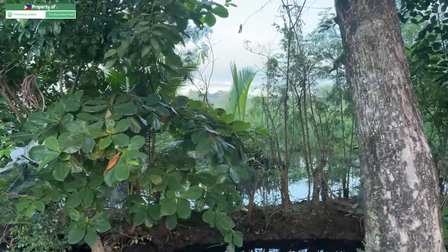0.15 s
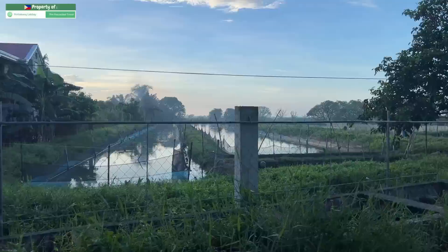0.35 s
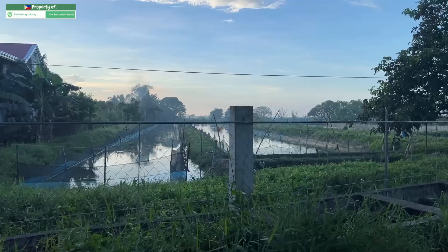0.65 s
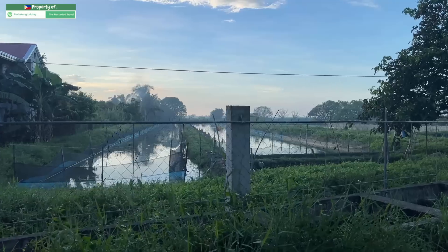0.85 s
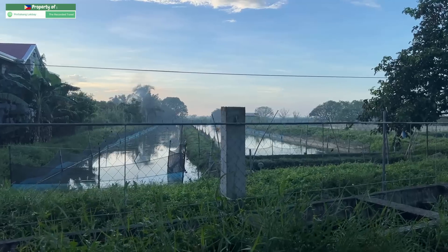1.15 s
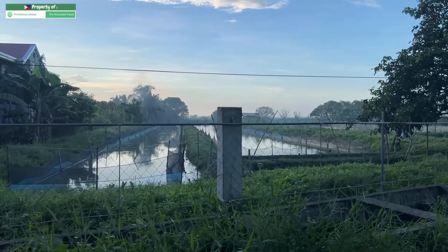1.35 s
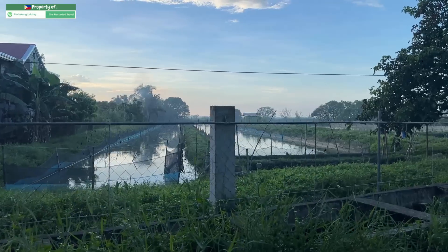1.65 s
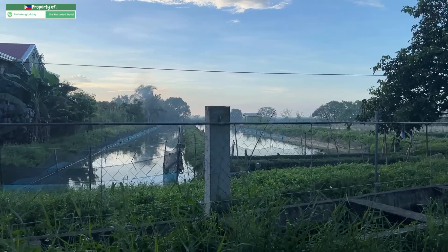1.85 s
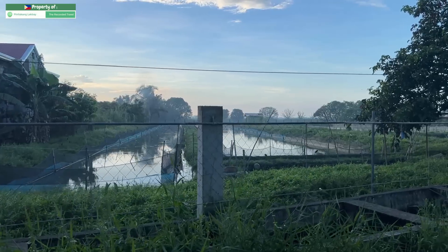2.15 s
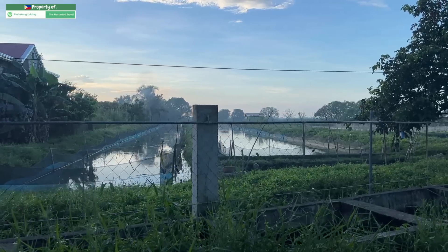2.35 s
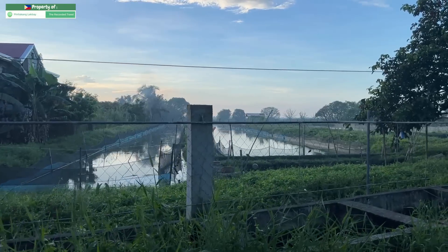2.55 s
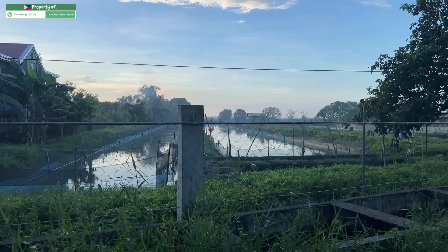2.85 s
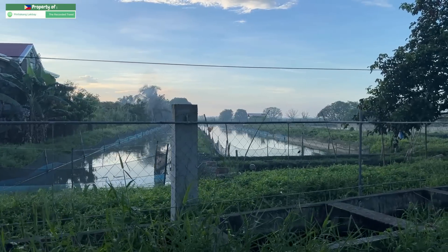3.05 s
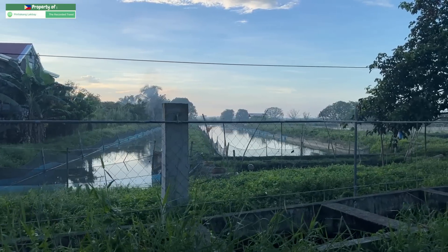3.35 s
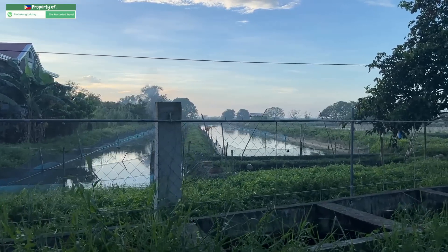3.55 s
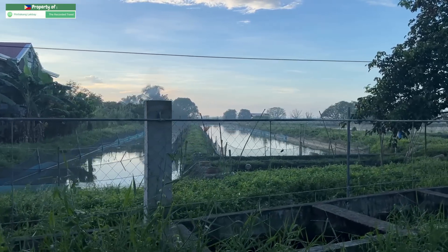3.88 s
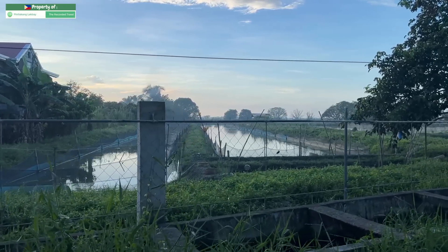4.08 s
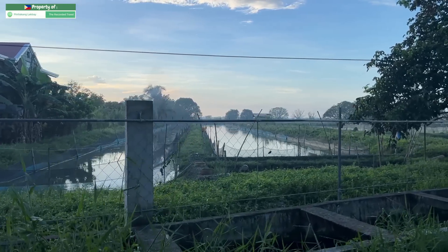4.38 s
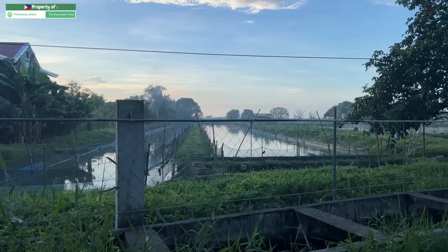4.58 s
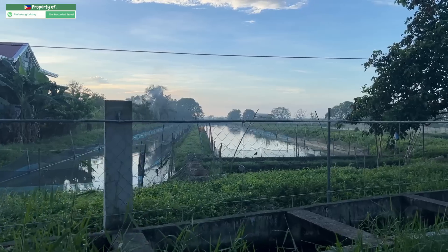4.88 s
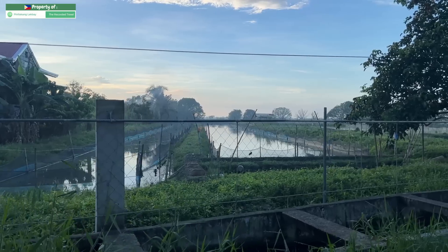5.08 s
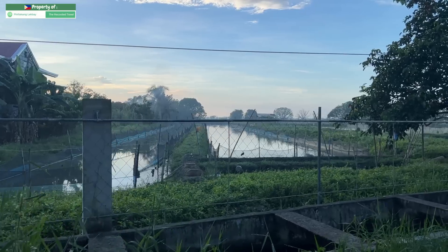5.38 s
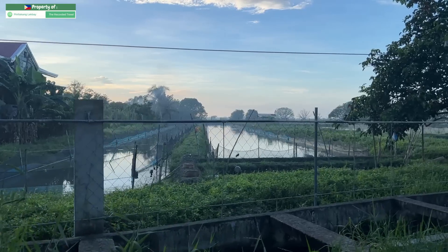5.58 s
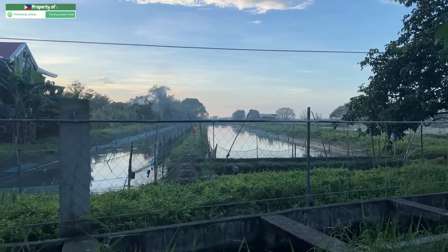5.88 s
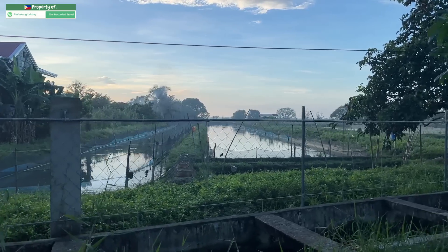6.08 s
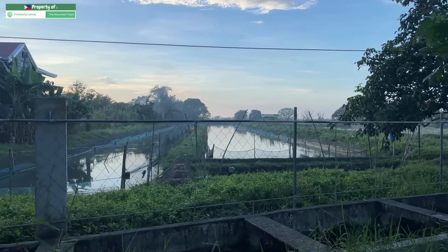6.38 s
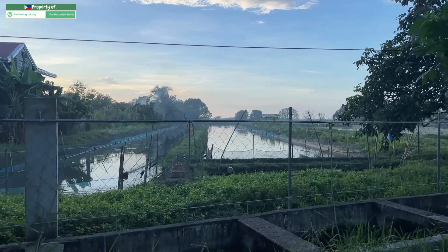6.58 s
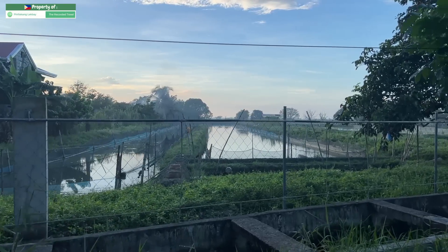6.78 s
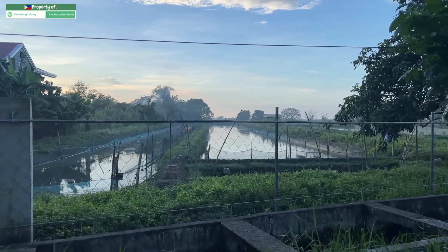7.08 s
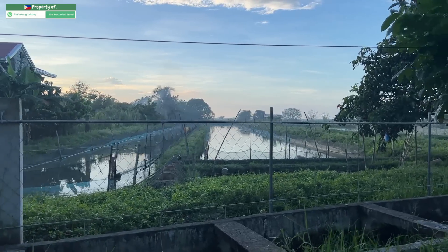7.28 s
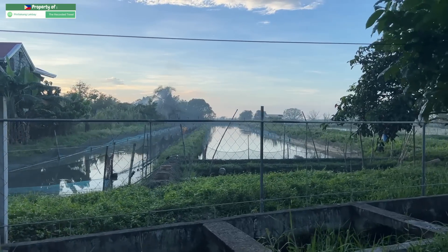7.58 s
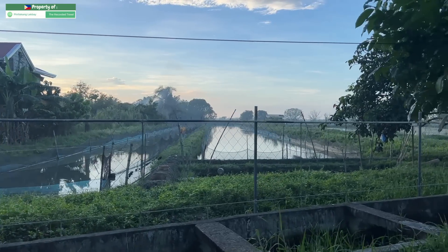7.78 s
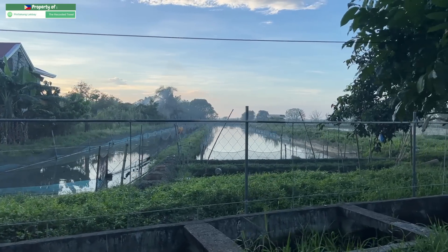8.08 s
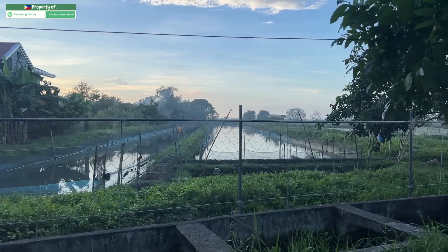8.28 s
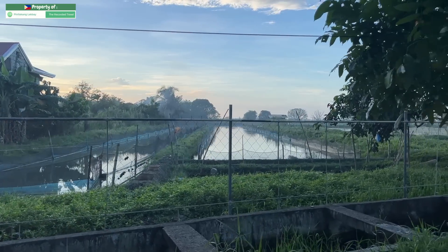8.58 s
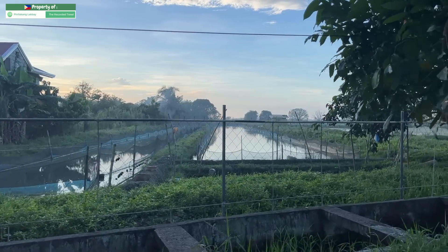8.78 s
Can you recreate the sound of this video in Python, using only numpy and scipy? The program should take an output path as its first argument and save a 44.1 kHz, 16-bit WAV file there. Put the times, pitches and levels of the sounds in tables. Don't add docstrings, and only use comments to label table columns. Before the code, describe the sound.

The sound opens on the tail of a hen's cluck, close and loud, with a soft rising cluck at 0.2 s. At about 0.35 s the background switches abruptly: the high, thin insect buzz becomes clearly stronger over a steady distant low rumble and airy hush. The near hen clucks at 0.37, 0.6 and 0.9 s, then again around 2.0, 2.3, 2.65 and 3.3 s, each a quick swoop that breaks upward and falls, raspy, slightly overloaded, with short yard echoes. Faint far cackles appear near 1.8, 3.6 and 6.7 s. Small birds whistle thinly, mostly from 2.2 to 5.3 s. A second hen on the left gives isolated two-part clucks at 4.6 and 5.8 s, then a group at 7.9, 8.2 and 8.6 s, the last ones softer and ragged. Dry twig ticks and light leaf rustles dot the whole, which ends on insects and rumble.

```python
import sys
import numpy as np
from scipy import signal
from scipy.fft import rfft, irfft, next_fast_len
from scipy.io import wavfile

SR = 44100
rng = np.random.default_rng(int(sys.argv[2]) if len(sys.argv) > 2 else 0)


def wav_record(signal):
    frames = np.transpose(np.atleast_2d(signal))
    bounded = np.clip(frames, -1, 1)
    quanta = np.round(bounded * 32767).astype(np.int16)
    wavfile.write(sys.argv[1], SR, quanta)


def nominal_scale(level):
    x = np.asarray(level, float) / 20
    return 10 ** x


N = 393809
TIME = np.arange(N) / SR
SIZE = next_fast_len(N + SR)
FREQ = np.maximum(np.arange(SIZE // 2 + 1) * SR / SIZE, 1)

# (frequency [Hz], density [dB per Hz])
RUMBLE = [(12, -73), (20, -66.5), (39, -9), (71, -1), (125, -5), (151, -9), (251, -16), (323, -22),
          (375, -20), (552, -28), (700, -54), (910, -68), (1540, -120)]
HUSH = [(180, -52), (300, -3), (350, -19.5), (477, -13), (601, -1), (739, -4.5), (1390, -9.5),
        (3040, -14.5), (5360, -14), (6500, -9), (8450, -51), (14300, -120)]
# (time [s], level [dB])
BUSTLE = [(0, -45.5), (.33, -49), (.36, -47.5), (1.79, -53), (2.2, -50), (7.66, -55), (8.12, -50.5),
          (8.93, -53)]
RUMBLE_DB, RUMBLE_FOLLOWS = -32.5, 0.46
# (centre [Hz], width [Hz], level [dB], throb rate [1/s])
INSECTS = [(6640, 110, -15.5, 95), (7266, 665, -7, 59), (8510, 1150, -15, 120), (10146, 1050, -20.5, 42),
           (14270, 820, -34, 42)]
SCENE_CHANGE_S = .347
INSECTS_BEFORE_DB, INSECTS_AFTER_DB, INSECTS_RISE_DB_PER_S = -48, -37, 0.21

# (frequency [Hz], likeness [0-1], left lead [rad], left-right [dB])
PORTS_AIR = [(60, .98, 0, -.7), (170, .9, .1, -1), (350, .4, .3, 0), (900, .5, 2.5, 0), (2200, .3, .9, 1),
             (4500, .4, .5, 5), (6000, .4, .2, 7), (7200, .65, -.4, 2), (8400, .87, -1.4, 2),
             (9300, .94, -2.5, 0), (9950, .995, -3.14, 0), (10700, .94, -3.95, 0), (14400, .75, -6.5, 0)]
PORTS_AHEAD = [(143.6, 0.68, 0.27, -1.5), (520, 0.28, 1.45, -1), (1030, 0.56, 1.33, 2),
               (1536, 0.52, 1.33, -3.5), (3000, 0.19, 2.2, 6.5), (8580, 0.18, 9.9, 11.5)]
PORTS_LEFT = [(150, 0.21, 0.16, -5), (520, 1, 1.94, 1.5), (1110, 0.16, 2.25, 0), (1670, 0.22, 4.08, 3),
              (3000, 0.3, 4.87, 6), (8060, 0.38, 11.6, 20)]
# (frequency [Hz], T60 [s])
YARD_DECAY = [(300, 0.9), (600, 0.63), (1000, 0.52), (1700, 0.52), (3000, 0.55), (7000, 0.34)]
# (delay [s], level [dB])
WALLS_AHEAD = [(.019, -20), (.035, -21), (.071, -20)]
WALLS_LEFT = [(.019, -16.5), (.035, -15), (.071, -16)]
FAR_WALL_AHEAD, FAR_WALL_LEFT = (0.11, -20), (0.15, -21.5)
FAR_WALL_CUT_HZ = 750
WET_AHEAD_DB, WET_LEFT_DB = -16, -12

# (start [s], peak [dB], centre [Hz],
# length [s])
RUSTLES = [(8.51, -41, 5500, .14), (8.17, -47, 4150, 0.13), (3.33, -42, 5700, 0.09),
           (.99, -31.5, 230, 0.133), (1.185, -34, 320, .045), (7.98, -26.5, 360, 0.0587),
           (5.81, -17, 400, 0.035), (2.996, -39, 2330, 0.08), (3.965, -47, 1490, 0.2),
           (5.44, -43, 5500, 0.13), (5.91, -46.5, 3300, 0.1), (6.36, -50, 4700, 0.09),
           (6.711, -52.5, 3800, 0.19), (.08, -43, 4050, .13), (.095, -43, 3450, .09), (.12, -46, 3050, .07),
           (0, -47, 3200, .055), (3.36, -45, 4400, .08), (5.555, -47, 2400, .06), (5.36, -50, 2500, .06),
           (4.66, -31, 330, .05), (7.8, -48, 4000, .05)]
# (start [s], peak [dB], pitch [Hz], left-right [dB])
TICKS = [(0.348, -18, 900, 1), (0.3634, -20, 800, 1), (.632, -20, 900, 0), (0.898, -25, 980, -4),
         (2.039, -25, 900, 0), (2.33, -22, 900, -1.5), (0.172, -25.5, 1500, 4.5), (2.0714, -27, 2700, 3),
         (2.0999, -29, 2580, 7.5), (2.1648, -25.5, 2690, 6.5), (2.235, -31, 3480, 15),
         (2.2606, -27.5, 2500, 8), (2.7205, -23.5, 2800, 14), (5.779, -29, 2900, 12),
         (5.812, -27.5, 2700, -6), (6.447, -38, 5700, 15), (7.3067, -35, 5240, 9), (1.511, -30, 1130, 1),
         (1.6492, -25.5, 1110, -2.5), (1.729, -29, 1410, 2.5), (1.845, -28, 1170, 13),
         (1.88, -30, 1090, 15), (2.4881, -11.5, 1020, 5.5), (2.4885, -18.5, 1960, 7),
         (2.528, -24.5, 1670, 7.5), (3.0085, -20.5, 1700, 2), (3.055, -18.5, 1120, -1),
         (3.164, -20.5, 1420, -3), (3.236, -22, 1310, 18), (3.709, -26, 1000, 18), (3.9578, -22, 1020, 4),
         (3.9844, -25.5, 5096, 19), (4.164, -28, 1390, 4), (4.435, -14.5, 4410, 10), (4.458, -27, 3350, 8),
         (5.2009, -23, 2410, 7), (5.4687, -29.5, 2120, 6), (5.5336, -33, 1840, -2),
         (6.0422, -38, 2440, 1.5), (6.2415, -29, 1360, 9), (6.9101, -28, 2107, 6), (7.042, -33, 1174, 12),
         (7.4655, -39, 4870, -22), (7.5191, -25.5, 3180, 13), (7.6574, -32.5, 2290, 8),
         (7.794, -32, 934, 14)]
TICK_T60_S = .008

# (start [s], length [s], pitch [Hz], level [dB])
CACKLES = [(1.775, 0.063, 999, -40.5), (1.825, 0.13, 1172, -38.5), (1.94, 0.043, 1040, -34),
           (3.49, 0.089, 1157, -39.5), (3.58, 0.043, 1135, -40.5), (3.63, 0.041, 1088, -39.5),
           (3.7, 0.045, 989, -40.5), (3.805, 0.147, 1065, -43), (4.03, 0.074, 670, -57),
           (6.64, 0.036, 1028, -54.5), (6.68, 0.195, 1222, -57.5), (6.89, 0.068, 1140, -59.5),
           (6.99, 0.142, 1188, -55)]
# (share of length, share of pitch, level [dB])
CACKLE = [(0, .82, 4), (0.221, 0.97, -1), (.8, 0.94, 5), (0.999, .84, -17.5)]
# (start [s], length [s], first pitch [Hz], last pitch [Hz], level [dB])
CHIRP = [
    (.068, 0.039, 4750, 4020, -44),
]
WHISTLES = [(2.25, .14, 5440, 5970, -46.5), (2.38, 0.25, 5870, 5087, -43.5),
            (3.69, 0.21, 5190, 4990, -43.5), (3.87, 0.32, 4970, 4996, -43.5),
            (2.88, 0.23, 3775, 3530, -48.5), (3.08, 0.1, 3680, 3900, -44), (3.18, 0.097, 3824, 3820, -48),
            (3.37, 0.089, 3800, 3800, -48), (3.49, 0.085, 3786, 3796, -42.5), (4.27, 0.4, 3585, 3516, -51),
            (4.66, 0.11, 3410, 3590, -48), (4.91, 0.23, 3090, 3120, -47.5), (5.15, 0.11, 3000, 2824, -48.5),
            (5.28, 0.071, 3110, 3410, -44.5), (7.14, 0.13, 2550, 2434, -53.5),
            (7.15, 0.098, 2300, 2220, -54), (1.07, 0.07, 4800, 3920, -48),
            (1.125, 0.051, 3580, 5350, -44.5), (6.8, 0.043, 4870, 5200, -50),
            (7.33, 0.056, 4460, 4300, -53)]
WHISTLE_FADE_DB = -2.5

# (centre [Hz], width [Hz], lift [dB])
THROAT = [(867, 98, 3), (1669, 47, 4.5)]
# (frequency [Hz], level [dB])
UPPER_AHEAD = [(1200, -22), (1600, -24.5), (1820, -13.5), (2050, -38.5), (2500, -37), (3000, -40.5),
               (3600, -51), (4300, -43.5)]
UPPER_LEFT = [(1200, -5), (1800, -13.5), (2150, -20.5), (2400, -33.5), (2750, -47), (3150, -23),
              (3600, -57)]
UPPER_FAR = [(1500, -40), (2200, -36), (3300, -42)]
BRIGHTER, FULL_VOICE_DB = .4, -9
# (centre [Hz], width [Hz], level [dB])
HISS_AHEAD = [(672, 320, -27), (1845, 220, -32.5), (2994, 300, -38.5), (4100, 500, -39), (6160, 900, -39)]
HISS_LEFT = [(800, 590, -31.5), (1930, 440, -29.5), (3025, 200, -39.5), (4190, 250, -42.5),
             (4800, 230, -41.5), (5840, 300, -40), (6340, 370, -35.5)]
RASP_DB = -21

# (share of length, share of pitch, 1st, 2nd, 3rd partial [dB])
SWOOP_AHEAD = [(0, .62, -22, -19, -23), (0.35, .8, -34, -10.5, -13), (0.649, .93, -15.5, 0, -42),
               (0.901, 0.98, -27.5, 1, -27), (1, 0.93, -24, 8, -28)]
SWOOP_LEFT = [(0, .56, -31.5, -30, -28), (0.402, .83, -12, -24, 4.5), (0.648, .94, -5, 1, -11.5),
              (0.998, 0.96, -3, -9.5, -11)]
SWOOP_LONG = [(0, .62, -20, -28, -15), (.3, .8, -27.5, -17.5, -11.5), (.6, .93, -15, -5.5, -16),
              (.9, .99, -17.5, 4, -34), (1, 0.94, -24.5, 0.5, -33)]
DROP = [(0, .92, -7.5, 4.5, -24), (.22, 1, -0.5, -14, -4.5), (.42, 0.99, -7, -6, 0),
        (.63, 0.97, -10.5, -4.5, -13), (0.732, .84, -8.5, 1.5, -23), (1.001, 0.25, -25, -20, -24)]
HOLD = [(0, 0.96, -6, 4, 9.5), (.25, 1, 1, 0.5, -5), (.6, 0.95, 2, -38, 3), (1, 0.9, -25, -28, -33)]
STEADY = [(0, .93, -3, -1, -32.5), (.3, 0.96, -4.5, -5.5, -6.5), (0.549, 1, 0.5, -6, -0.5),
          (.8, 0.98, -0.5, -2.5, -9.5), (1, 0.83, -6, -14.5, -29.5)]
STEADY_FIRM = [(0, .92, -20, 4, -9.5), (.3, 0.98, -2.5, -4.5, -6.5), (.55, 0.99, 0, 1, -2),
               (.85, .99, -2, -8.5, -8), (1, 0.99, -3, -13.5, -14)]
FALL = [(0, 1, -21, -10.5, -18.5), (.3, .9, -23, -2.5, -22.5), (.65, .76, -27, -7.5, -21),
        (1, 0.51, -28.5, -15.5, -22)]
ARCH = [(0, .93, -5.5, -12.5, -18), (.14, 0.97, -2.5, -10, -5.5), (.35, 1, -2.5, -11, -1.5),
        (.52, 0.97, -1, -4.5, -5.5), (.7, .91, -7.5, -2, -21), (.8, .83, -17, -15.5, -30),
        (.93, 0.706, -15, -1, -33), (1, .68, -28, -14.5, -34.5)]
ARCH_LATE = [(0, .88, -5, -6, -19), (.25, .98, -7.5, -2, -14), (.45, 1, -1.5, -3, -1),
             (.68, 0.96, -0.5, -6.5, -7.5), (.82, .88, -7, -8, -26), (.93, 0.72, -13, 0, -28),
             (1, .7, -23.5, -9.5, -27)]
ARCH_SOFT = [(0, .55, -15, -13, -29.5), (.2, .72, -12, -5.5, -28), (.38, .88, -3.5, -4, -27),
             (.5, 0.98, -2, -12, -27), (.75, 0.96, 4.5, -21, -25), (1, 1, -7.5, -23.5, -28)]
BURST = [(0, 1, -16.5, 0, -14.5), (1, .93, -15, -1.7, -17.5)]
DROP_S, SWOOP_LEFT_S, HOLD_S, STEADY_S = .11, .08, .085, .075

# (end [s], pitch [Hz], 1st, 2nd, 3rd partial [dB])
SWOOPS_LEFT = [(4.598, 582, -11, -10.5, -19), (5.772, 563, -10, -10.5, -15),
               (7.928, 566.1, -9.5, -10, -14.5), (8.212, 497, -16, -20, -28), (8.578, 507, -17, -16, -20)]
HOLDS_LEFT = [(4.675, 609, -9, -17.5, -24), (5.86, 599, -8.5, -20, -27.5), (8.01, 611.4, -9, -24.5, -26)]
DROPS_LEFT = [(8.315, 536, -19.5, -29.5, -22), (8.665, 515, -21.5, -21.5, -25)]
# (end [s], pitch [Hz], 1st, 2nd, 3rd partial [dB])
STEADIES_AHEAD = [
    (.066, 520, -15.5, -37.5, -37),
    (.965, 507.7, -22, -35, -28.5),
    (2.095, 574.4, -14, -15.5, -25),
    (3.41, 564, -17.5, -33.5, -29),
]
STEADIES_FIRM = [(2.4, 561.3, -10.5, -19.5, -21.5), (2.724, 565, -10.5, -20.5, -24)]
# (start [s], length [s], pitch [Hz], level [dB])
SWOOPS_AHEAD = [(.585, 0.039, 440.6, -10.5), (.845, 0.044, 466.3, -11), (1.982, .037, 487.4, -10)]
SWOOPS_LONG = [(2.27, 0.05, 502, -7.5), (2.602, .057, 517.6, -6), (3.265, 0.044, 495.4, -10.5)]
FALLS_AHEAD = [(.066, 0.054, 465, -27), (.942, 0.058, 507, -11.5), (2.09, .04, 502, -10.5),
               (2.394, .038, 468, -10.5), (2.703, 0.041, 560, -10)]
ARCHES = [
    (.366, .088, 553.7, -12),
]
ARCHES_LATE = [
    (.632, .104, 520, -17.5),
]
ARCHES_SOFT = [
    (.205, .13, 501, -23.5),
]
BURSTS = [(.347, 0.0084, 476, -16), (.36, 0.0096, 401, -14.5), (.894, .01, 490, -14),
          (2.019, 0.013, 450, -12.5), (2.036, .009, 443, -13.5), (2.119, 0.0097, 401, -19)]
# (start [s], length [s], level [dB])
RATTLES = [(0.343, 0.026, -20), (.452, 0.021, -26), (0.622, 0.038, -22.5), (.735, 0.027, -27.5),
           (.89, 0.029, -25.5), (2.007, 0.14, -25.5), (2.32, 0.057, -36.5), (3.309, 0.092, -22)]
RATTLES_LEFT = [
    (8.0, 0.03, -31),
    (8.265, .06, -31.5),
    (8.61, .05, -29.5),
]
SLAPS_PER_S, SLAP_HZ, SLAP_WIDTH_HZ = 410, 677, 217
SLAP_HIGH_HZ, SLAP_HIGH_WIDTH_HZ, SLAP_HIGH_DB = 1723, 210, -11.5
# (time [s], half length [s], depth [dB])
CATCHES_AHEAD = [(2.017, 0.0013, -7), (2.033, 0.0065, -20), (.89, 0.003, -14), (0.85, .005, -5)]
CATCHES_LEFT = [(5.766, 0.0076, -7.5), (5.797, 0.0078, -14), (5.827, 0.0062, -19.5), (7.927, 0.0061, -0.5),
                (7.976, 0.0082, -10.5)]


def at_hz(points):
    hz, *columns = np.transpose(points)
    return [np.interp(np.log(FREQ), np.log(hz), column) for column in columns]


def rms_one(x):
    return x / np.sqrt(np.mean(x ** 2) + 1e-20)


def drift(rate_hz):
    r = np.exp(-2 * np.pi * rate_hz / SR)
    slow = signal.lfilter([1], [1, -2 * r, r * r], rng.standard_normal(N + SR))
    return rms_one(slow[SR:])


def band_sos(order, low_hz, high_hz):
    return signal.butter(order, [low_hz, high_hz], "band", fs=SR, output="sos")


def resonance(x, hz, width_hz):
    r = np.exp(-np.pi * width_hz / SR)
    numerator = [(1 - r * r) / 2, 0, (r * r - 1) / 2]
    denominator = [1, -2 * r * np.cos(2 * np.pi * hz / SR), r * r]
    return signal.lfilter(numerator, denominator, x + 1e-18)


def ports(x, table, other=0):
    alike, lead_rad, pan_db = at_hz(table)
    alike = np.clip(alike, 0, 1)
    mid = rfft(x, SIZE) * np.sqrt((1 + alike) / 2)
    side = rfft(other + 0 * x, SIZE) * np.sqrt((1 - alike) / 2)
    tilt = nominal_scale(pan_db / 2) * np.exp(.5j * lead_rad)
    return irfft(np.array([(mid + side) * tilt, (mid - side) / tilt]), SIZE)[:, :N]


def yard(x):
    t, tail = np.arange(SR) / SR, 0
    hz, t60_s = np.transpose(YARD_DECAY)
    edges = np.sqrt(hz[1:] * hz[:-1])
    for low, high, decay_s in zip([100, *edges], [*edges, 12000], t60_s):
        band = signal.sosfilt(band_sos(2, low, high), rng.standard_normal((2, SR)))
        tail = tail + band * nominal_scale(-60 * t / decay_s) * np.clip(t / 0.0031, 0, 1)
    return irfft(rfft(x, SIZE) * rfft(tail / np.sqrt(SR / 20), SIZE), SIZE)[:, :N]


def walls(x, near, far_wall):
    dull = signal.sosfilt(signal.butter(2, FAR_WALL_CUT_HZ, fs=SR, output="sos"), x)
    paths = [(x, *wall) for wall in near] + [(dull, *far_wall)]
    out = x
    for sound, delay_s, level_db in paths:
        out = out + nominal_scale(level_db) * np.interp(TIME - delay_s, TIME, sound, left=0)
    return out


def coloured(spectrum, patchy_db, rate_hz):
    whole = rfft(rng.standard_normal((2, N)), SIZE) * nominal_scale(at_hz(spectrum)[0])
    hz = np.transpose(spectrum)[0]
    steps = 2 * np.log2(np.clip(FREQ, hz[1], hz[-2]) / hz[1])
    out = 0
    for k in range(int(steps.max()) + 2):
        band = irfft(whole * np.clip(1 - abs(steps - k), 0, 1), SIZE)[:, :N]
        out = out + band * nominal_scale(patchy_db * drift(rate_hz))
    return rms_one(out)


def insects():
    out = 0
    for hz, width_hz, level_db, throb_hz in INSECTS:
        phase = 2 * np.pi * np.cumsum(throb_hz * (1 + 0.039 * drift(2.15))) / SR
        beat = 1 + 0.19 * np.sin(phase)
        struck = rng.random((2, N)) < 9000 / SR
        clicks = rng.standard_normal((2, N)) * struck * beat * nominal_scale(1.3 * drift(4))
        body = band_sos(3, max(hz - width_hz / 2, 20), hz + width_hz / 2)
        out = out + nominal_scale(level_db) * np.sqrt(width_hz) * rms_one(signal.sosfilt(body, clicks))
    return rms_one(out)


def background():
    hush_db = np.interp(TIME, *np.transpose(BUSTLE))
    rumble_db = RUMBLE_DB + RUMBLE_FOLLOWS * (hush_db - hush_db.mean())
    later_db = INSECTS_AFTER_DB + INSECTS_RISE_DB_PER_S * TIME
    insect_db = np.where(TIME < SCENE_CHANGE_S, INSECTS_BEFORE_DB, later_db)
    air = nominal_scale(rumble_db) * coloured(RUMBLE, patchy_db=1.5, rate_hz=14.0)
    air = air + nominal_scale(hush_db + 5.0) * coloured(HUSH, patchy_db=2, rate_hz=8)
    air = air + nominal_scale(insect_db) * insects()
    return ports(air[0], PORTS_AIR, air[1])


def rustles():
    out, rough = np.zeros((2, N)), nominal_scale(3.5 * drift(180))
    for start_s, peak_db, hz, length_s in RUSTLES:
        t = np.arange(round(length_s * SR))
        at = round(start_s * SR) + t
        grain = rng.standard_normal((2, SR))[:, :len(t)] * rough[at]
        swell = nominal_scale(peak_db) * np.sin(np.pi * t / len(t))
        out[:, at] += swell * rms_one(resonance(grain, hz, 0.15 * hz))
    return out * nominal_scale(np.array([[2.5], [-2.5]]))


def ticks():
    out, t = np.zeros((2, N)), np.arange(900) / SR
    snaps = signal.sosfilt(band_sos(2, 700, 5000), rng.standard_normal((len(TICKS), len(t))))
    for (start_s, peak_db, hz, pan_db), snap in zip(TICKS, snaps):
        ring = np.sin(2 * np.pi * hz * t) * nominal_scale(-60 * t / TICK_T60_S) * (1 - np.exp(-t / 0.00015))
        tick = ring + 0.26 * snap * nominal_scale(-60 * t / 0.041)
        i = round(start_s * SR)
        pan = np.array([[pan_db], [-pan_db]]) / 2
        out[:, i:i + len(t)] += nominal_scale(peak_db + 3.0 + pan) * tick
    return out + nominal_scale(-4.0) * yard(out.mean(axis=0))


def shaped(rows, shape):
    share, pitch, *levels = np.transpose(shape)
    out = []
    for start_s, length_s, hz, *level_db in rows:
        times_s = np.maximum(start_s + length_s * share, 0)
        out.append(np.c_[times_s, hz * pitch, np.transpose(levels) + level_db])
    return out


def ending(rows, shape, length_s):
    return shaped([(end_s - length_s, length_s, *rest) for end_s, *rest in rows], shape)


def glides(rows):
    out = []
    for start_s, length_s, first_hz, last_hz, level_db in rows:
        end = (start_s + length_s, last_hz, level_db + WHISTLE_FADE_DB)
        out.append([(start_s, first_hz, level_db), end])
    return out


def sing(tables, upper, wobble, flutter_db, edge_s, count, brighter=0):
    out = np.zeros(N)
    shake, flutter = 1 + wobble * drift(39.6), nominal_scale(flutter_db * drift(32))
    upper_hz, upper_db = np.transpose(upper)
    for rows in tables:
        s, hz, *levels = np.transpose(rows)
        span = slice(round(s[0] * SR), round(s[-1] * SR))
        t = TIME[span]
        pitch = np.interp(t, s, hz)
        phase = 2 * np.pi * np.cumsum(pitch * shake[span]) / SR
        since_start = t - s[0] + (s[0] == 0)
        edge = np.clip(np.minimum(since_start, s[-1] - t) / edge_s, 0, 1)
        gains = [nominal_scale(np.interp(t, s, level_db)) for level_db in levels]
        whole = np.sqrt(np.sum(np.square(gains), axis=0))
        effort_db = brighter * (np.max(levels) - FULL_VOICE_DB)
        for k in range(len(levels) + 1, count + 1):
            gains.append(whole * nominal_scale(np.interp(k * pitch, upper_hz, upper_db) + effort_db))
        stack = sum(gain * np.sin(k * phase) for k, gain in enumerate(gains, 1))
        out[span] += np.sqrt(2) * edge * flutter[span] * stack
    return out


def far_hens():
    hens = sing(shaped(CACKLES, CACKLE), UPPER_FAR, wobble=0.016, flutter_db=5.0, edge_s=0.0073, count=3)
    return ports(nominal_scale(12.0) * hens, PORTS_LEFT) + nominal_scale(-1.0) * yard(hens)


def small_birds():
    bird = sing(glides(CHIRP), UPPER_FAR, wobble=0.036, flutter_db=5.0, edge_s=0.012, count=1)
    bird += sing(glides(WHISTLES), UPPER_FAR, wobble=0.00686, flutter_db=-0.5, edge_s=0.016, count=1)
    bird *= 1 + .25 * drift(110)
    return bird * nominal_scale(np.array([[1.5], [-4.5]])) + nominal_scale(3.0) * yard(bird)


def rattles(rows):
    slaps = (rng.random(N) < SLAPS_PER_S / SR) * np.tanh(2 * rng.standard_normal(N))
    low = resonance(resonance(slaps, SLAP_HZ, SLAP_WIDTH_HZ), SLAP_HZ, 2 * SLAP_WIDTH_HZ)
    high = resonance(slaps, SLAP_HIGH_HZ, SLAP_HIGH_WIDTH_HZ)
    high = resonance(high, SLAP_HIGH_HZ, SLAP_HIGH_WIDTH_HZ)
    rung = rms_one(low) + nominal_scale(SLAP_HIGH_DB) * rms_one(high)
    gate = 0
    for start_s, length_s, level_db in rows:
        end_s, gain = start_s + length_s, nominal_scale(level_db)
        corners_s = [start_s, start_s + 0.0041, end_s, end_s + 0.011]
        gate = gate + np.interp(TIME, corners_s, [0, gain, gain, 0])
    return rung * gate


def catches(rows):
    return nominal_scale(sum(depth_db * np.exp(-((TIME - s) / half_s) ** 2) for s, half_s, depth_db in rows))


def hen(clucks, upper, hiss, table, rasp_hz, wet_db, near, far_wall, rattle, gate):
    voice = sing(clucks, upper, wobble=.009, flutter_db=1.0, edge_s=.004, count=8, brighter=BRIGHTER)
    voice = voice * gate
    puffs = np.abs(voice) * rng.standard_normal(N)
    voice = voice * (1 + nominal_scale(RASP_DB) * drift(rasp_hz))
    throat = sum((nominal_scale(lift_db) - 1) * resonance(voice, hz, width_hz) for hz, width_hz, lift_db in THROAT)
    voice = 0.73 * voice + rattle + throat
    for hz, width_hz, level_db in hiss:
        breath = resonance(resonance(puffs, hz, width_hz), hz, width_hz)
        voice = voice + nominal_scale(level_db) * np.sqrt(SR / width_hz) * breath
    return ports(walls(voice, near, far_wall), table) + nominal_scale(wet_db) * yard(voice)


def hen_left():
    clucks = ending(SWOOPS_LEFT, SWOOP_LEFT, SWOOP_LEFT_S)
    clucks += ending(HOLDS_LEFT, HOLD, HOLD_S) + ending(DROPS_LEFT, DROP, DROP_S)
    return hen(clucks, UPPER_LEFT, HISS_LEFT, PORTS_LEFT, rasp_hz=287, wet_db=WET_LEFT_DB,
               near=WALLS_LEFT, far_wall=FAR_WALL_LEFT,
               rattle=rattles(RATTLES_LEFT), gate=catches(CATCHES_LEFT))


def hen_ahead():
    clucks = shaped(SWOOPS_AHEAD, SWOOP_AHEAD) + shaped(SWOOPS_LONG, SWOOP_LONG)
    clucks += ending(STEADIES_AHEAD, STEADY, STEADY_S) + ending(STEADIES_FIRM, STEADY_FIRM, STEADY_S)
    clucks += shaped(FALLS_AHEAD, FALL) + shaped(BURSTS, BURST)
    clucks += shaped(ARCHES, ARCH) + shaped(ARCHES_LATE, ARCH_LATE) + shaped(ARCHES_SOFT, ARCH_SOFT)
    return hen(clucks, UPPER_AHEAD, HISS_AHEAD, PORTS_AHEAD, rasp_hz=300.5, wet_db=WET_AHEAD_DB,
               near=WALLS_AHEAD, far_wall=FAR_WALL_AHEAD,
               rattle=rattles(RATTLES), gate=catches(CATCHES_AHEAD))


def scene():
    out = background() + rustles() + ticks()
    out = out + far_hens() + small_birds()
    return out + nominal_scale(7.0) * (hen_left() + hen_ahead())


def top_cut(x):
    return signal.sosfilt(signal.butter(12, 15620, fs=SR, output="sos"), x)


def record(dry):
    clipped = np.clip(dry, -1, 1)
    low_pass = signal.cheby2(10, 40, 15900, fs=SR, output="sos")
    mix = signal.sosfilt(low_pass, clipped)
    return top_cut(mix)


dry = scene()
out = record(dry)
wav_record(out)
```